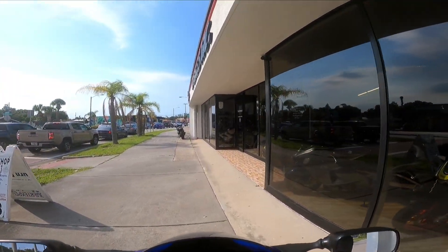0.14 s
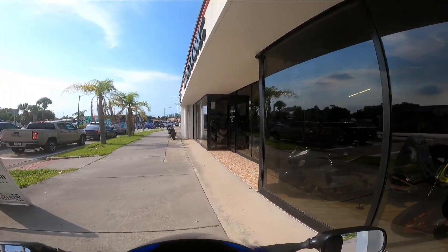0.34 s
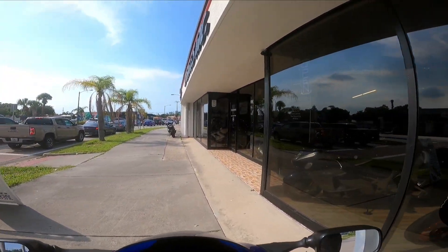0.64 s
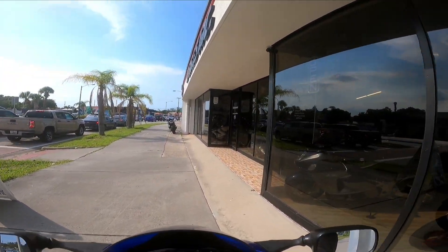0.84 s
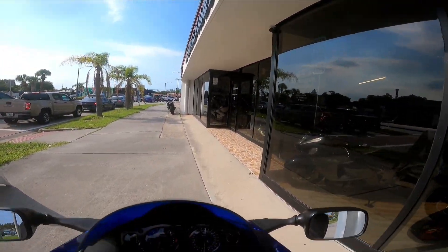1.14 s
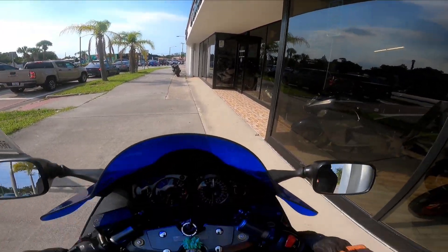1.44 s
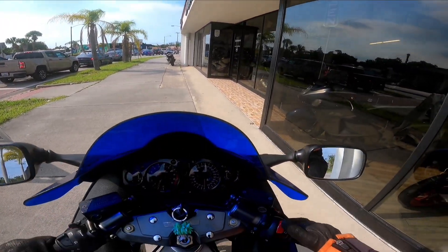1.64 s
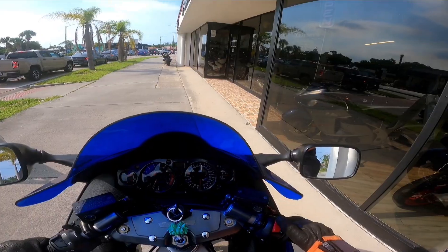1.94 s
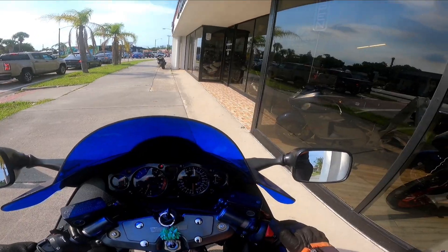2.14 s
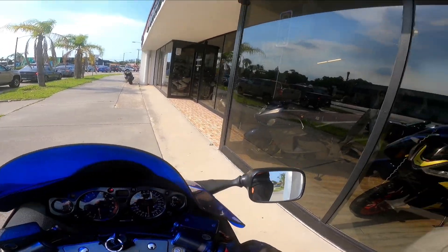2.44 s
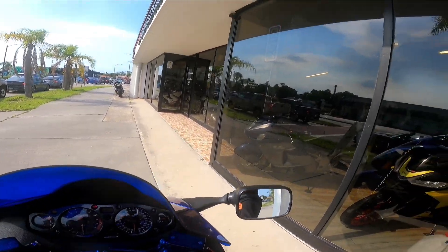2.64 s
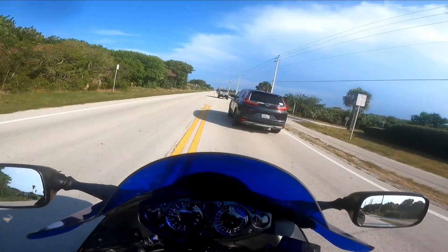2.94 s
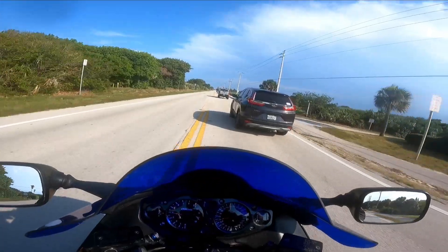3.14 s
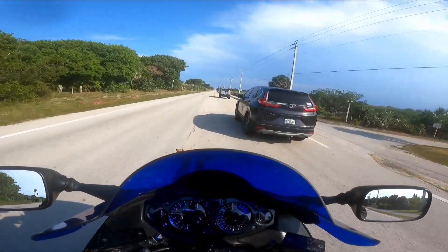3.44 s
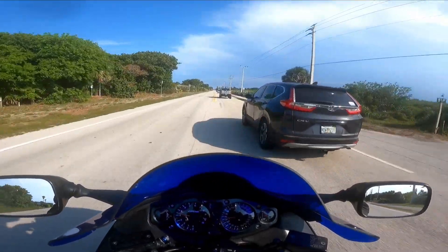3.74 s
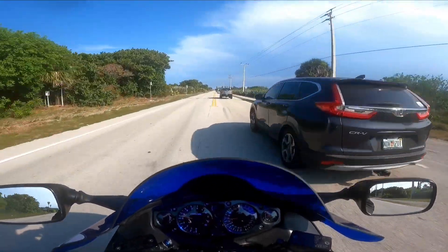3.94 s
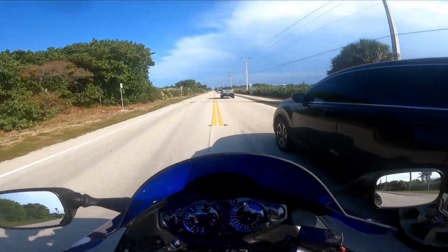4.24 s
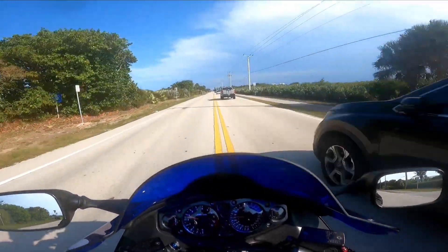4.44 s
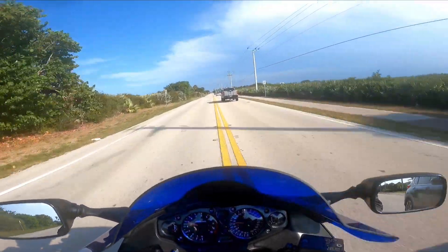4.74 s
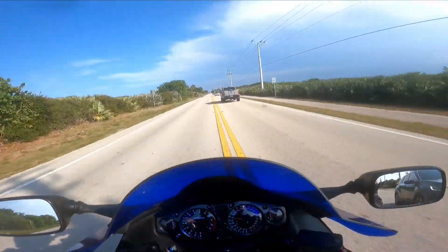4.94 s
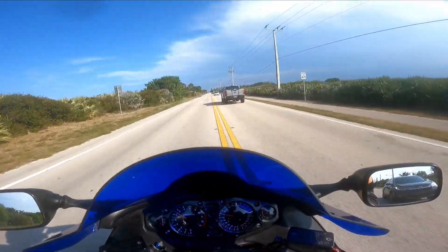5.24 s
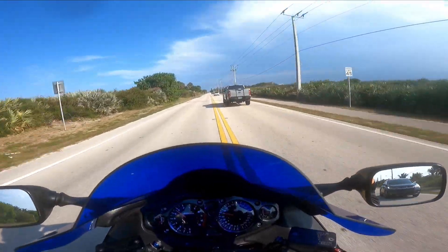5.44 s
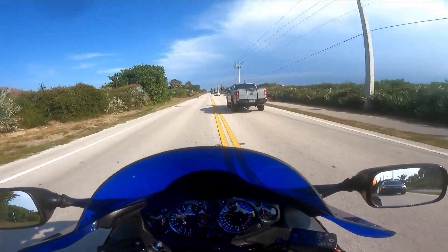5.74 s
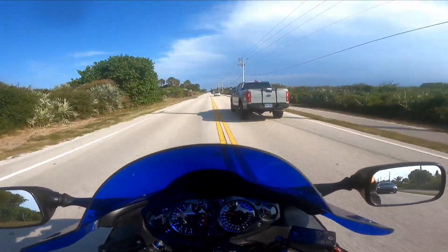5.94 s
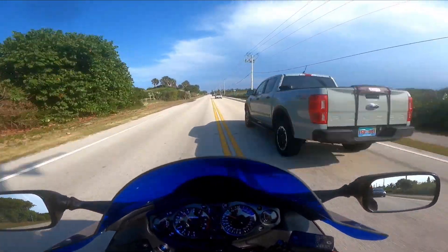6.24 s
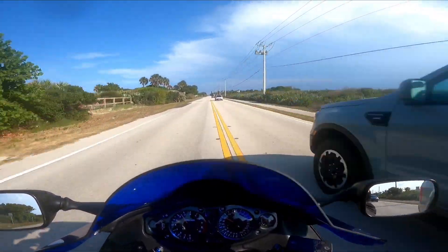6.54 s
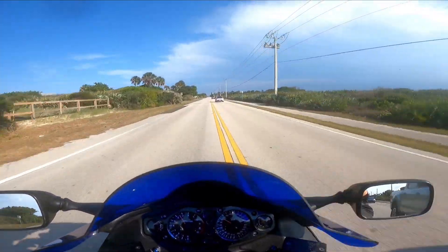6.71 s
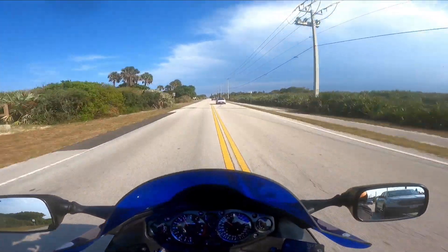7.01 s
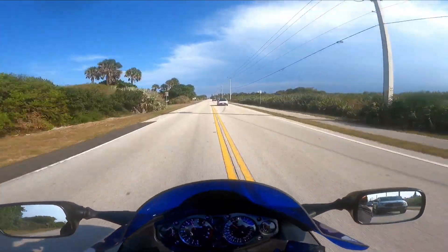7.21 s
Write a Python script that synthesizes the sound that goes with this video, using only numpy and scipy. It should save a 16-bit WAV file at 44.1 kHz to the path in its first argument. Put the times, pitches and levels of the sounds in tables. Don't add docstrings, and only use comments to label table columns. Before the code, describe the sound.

A sport motorcycle idles in a low uneven drone, clicks off and dies, then after brief silence accelerates on an open road through buffeting wind.

```python
import sys
import numpy as np
from scipy import signal
from scipy.io import wavfile
from scipy.ndimage import uniform_filter1d

SR = 44100
rng = np.random.default_rng(int(sys.argv[2]) if len(sys.argv) > 2 else 0)


def elevation(decibels):
    levels = np.asarray(decibels, float)
    return 10 ** (levels / 20)


def to_wav(sig):
    pcm = np.clip(np.atleast_2d(sig), -1, 1) * 32767
    pcm = np.round(pcm).astype(np.int16)
    wavfile.write(sys.argv[1], SR, pcm.T)


N = 325017
TIME = np.arange(N) / SR


def evened(x):
    return x / np.sqrt(np.mean(x ** 2) + 1e-20)


def columns(rows):
    s, *values = np.transpose(rows)
    return [np.interp(TIME, s, v) for v in values]


def wander(hz):
    span = max(int(SR / 64 / hz / 3), 1)
    steps = rng.standard_normal(N // 64 + 2)
    steps = uniform_filter1d(uniform_filter1d(steps, span), span)
    return np.interp(np.arange(N) / 64, np.arange(len(steps)), evened(steps))


def noise(shape, size, patchy_db, flicker_db):
    frames, hz = 4 * N // size + 5, np.fft.rfftfreq(size, 1 / SR)
    a, b, patches = rng.standard_normal((frames, len(hz), 3)).T
    patches = uniform_filter1d(patches, size=size // 64, axis=0)
    patches = evened(uniform_filter1d(patches, size=8, axis=1))
    flicker = evened(uniform_filter1d(rng.standard_normal(frames), size=4))
    f, db = np.transpose(shape)
    colour_db = np.interp(np.log(hz + 1), np.log(f + 1), db, left=-90, right=-120)[:, None]
    z = (a + 1j * b) * elevation(colour_db + patchy_db * patches + flicker_db * flicker)
    return evened(signal.istft(z, nperseg=size, noverlap=size * 3 // 4)[1][:N])


def order(turns, k, wobble_db, slip, hz):
    phase = 2 * np.pi * (k * turns + rng.random()) + slip * wander(hz)
    return np.sqrt(2) * elevation(wobble_db * wander(hz)) * np.sin(phase)


def lift(hz, centre_hz, width_hz):
    return 1 / (1 + (2 * (hz - centre_hz) / width_hz) ** 2)


def resonances(hz, rows):
    return sum(elevation(top_db) * lift(hz, centre_hz, width_hz) for centre_hz, width_hz, top_db in rows)


def bumps(rows, width_s):
    return sum(db * np.exp(-((TIME - s) / width_s) ** 2) for s, db in rows)


def held(start, rise_s, hold_s, fall_s):
    t = TIME - start
    return np.clip(t / rise_s, 0, 1) * np.exp(-np.maximum(t - rise_s - hold_s, 0) / fall_s)


# (time [s], firing rate [Hz], stroke strength [dB])
IDLE_SPEED = [(0, 37.26, -13), (.2, 37.26, 2), (.4, 39.34, -1.5), (.55, 39.53, 1), (.7, 39, -1),
              (.85, 36.91, 2), (.95, 37.72, 2), (1.04, 37.17, -0.5), (1.15, 40.46, -2), (1.35, 40.15, 2.5),
              (1.52, 39, -4), (1.66, 39.3, 0), (1.84, 37.3, -9), (2.03, 40.9, -3.5), (2.2, 38.82, -2.5),
              (2.3, 33.97, -4), (2.45, 26.55, 4)]


def idle_strokes():
    firing, stroke_db = columns(IDLE_SPEED)
    off_s, rundown_db_per_s = 2.18, -65
    run_db = rundown_db_per_s * np.maximum(TIME - off_s, 0)
    return firing, stroke_db, np.cumsum(firing) / SR, run_db


# (time [s], level [dB])
TANK_SHUDDERS = [(.24, 2.5), (.4, 7), (.67, 4), (.85, 5), (1.03, 5), (1.3, 10.5), (1.52, 9), (1.63, -5),
                 (1.7, 4.5), (1.77, -6.5), (1.9, 6), (2.1, 5)]


def firing_boom():
    firing, stroke_db, turns, run_db = idle_strokes()
    boom_db = -15.5 + 1.7 * (firing - 39) + stroke_db
    even_db = -23 - 7 * TIME + .3 * run_db
    third_db = -22.5 + bumps(TANK_SHUDDERS, width_s=.05) + 1.1 * run_db
    tank = 0.31 + lift(3 * firing, 110, 14)
    airbox = .25 + lift(4 * firing, 149, 16)
    out = elevation(boom_db) * order(turns, 1, wobble_db=.6, slip=.1, hz=6)
    out += elevation(even_db) * order(turns, 2, wobble_db=.8, slip=.15, hz=7)
    out += elevation(third_db) * tank * order(turns, 3, wobble_db=.9, slip=.25, hz=9)
    return out + elevation(even_db - 1) * airbox * order(turns, 4, wobble_db=1.3, slip=.25, hz=8)


# (pitch [Hz], width [Hz])
FAIRING_PANELS = [
    (245, 19),
    (283, 26),
]
# (start [s], length [s], sixth order level [dB], seventh order level [dB])
FAIRING_BUZZES = [
    (0.014, 0.093, -22.5, -25),
    (.36, 0.46, -33, -30.5),
    (1.073, .3, -29.5, -35),
    (1.553, 0.27, -25, -33.5),
    (2.031, 0.12, -30, -34),
]


def fairing_buzz():
    firing, _, turns, run_db = idle_strokes()
    strong = 1 + .5 * np.cos(np.pi / 2 * (turns - turns[round(1.133 * SR)]))
    out = np.zeros(N)
    for i, (hz, width_hz) in enumerate(FAIRING_PANELS):
        k = i + 6
        panel = .15 + lift(k * firing, hz, width_hz)
        buzz = sum(elevation(levels_db[i]) * held(s, .04, length, .05)
                   for s, length, *levels_db in FAIRING_BUZZES)
        tone = order(turns, k, wobble_db=1.2, slip=.4, hz=10)
        out += (elevation(-35 + run_db) + buzz) * strong * panel * tone
    return out


# (pitch [Hz], level per Hz [dB])
LUMP_COLOUR = [(15, -18.5), (30, -19.5), (50, -10.5), (75, 3.5), (115, 1.5), (150, -6), (190, -10),
               (260, -14), (330, -28)]
# (pitch [Hz], level per Hz [dB])
THRUM_COLOUR = [(230, -16), (300, 0), (340, -7), (400, -1.5), (480, -9.5), (600, -19), (800, -41.5)]
# (pitch [Hz], level per Hz [dB])
CASE_COLOUR = [(450, -31.5), (560, -1.5), (680, -8.5), (800, -0.5), (930, -1.5), (1020, 2), (1250, -2),
               (1570, -8.5), (1700, -1.5), (1920, -8), (2300, -26), (3000, -42)]
# (pitch [Hz], level per Hz [dB])
CLATTER_COLOUR = [(1900, -4), (2300, -0.5), (2600, -5), (2850, -3.5), (3300, -7), (4200, -12.5),
                  (5000, -18), (6300, -22), (8000, -27.0), (9000, -34), (11000, -40.5), (15000, -43.5)]
# (thrum [dB], case [dB], clatter [dB], lumps [dB])
REST_DROP = (-16, -16, -15.5, -9)
# (thrum [dB], case [dB], clatter [dB])
GASP_LEVEL = (-33.5, -40.5, -55.5)
# (thrum [dB], case [dB], clatter [dB])
SETTLE_LEVEL = (-51, -52.5, -76)


def engine_noise():
    _, _, turns, run_db = idle_strokes()
    gasp = held(2.343, rise_s=.011, hold_s=0.072, fall_s=0.035)
    settle = held(2.55, rise_s=0.11, hold_s=1, fall_s=1)
    running_db = (-35.5, -41, -52, -23)
    *levels, lumps = [elevation(db + np.maximum(0.59 * run_db, rest_db))
                      for db, rest_db in zip(running_db, REST_DROP)]
    thrum, case, clatter = [level + elevation(gasp_db) * gasp + elevation(settle_db) * settle
                            for level, gasp_db, settle_db in zip(levels, GASP_LEVEL, SETTLE_LEVEL)]
    stroke = 1 + 0.088 * np.cos(2 * np.pi * turns)
    out = lumps * noise(LUMP_COLOUR, size=4096, patchy_db=.5, flicker_db=.2)
    for k in range(9, 13):
        out += elevation(-17.0) * thrum * order(turns, k, wobble_db=3.0, slip=0.75, hz=4.5)
    out += elevation(-1.5) * thrum * stroke * noise(THRUM_COLOUR, size=2048, patchy_db=.5, flicker_db=.2)
    out += case * stroke * noise(CASE_COLOUR, size=1024, patchy_db=0.6, flicker_db=0.4)
    return out + elevation(4.5) * clatter * stroke * noise(CLATTER_COLOUR, size=512, patchy_db=1.4, flicker_db=-1.44)


# (time [s], level [dB])
DRONE_LEVEL = [(0, -16), (.45, -28.5), (.95, -21), (1.3, -21.5), (1.7, -18.5), (2.15, -19), (2.7, -24.5),
               (2.77, -49)]
# (time [s], level [dB])
FRAME_SWAYS = [
    (2.3, 3.5),
    (2.41, -7),
    (2.5, 6),
    (2.65, 0.5),
]


def drone():
    hz = 49.05 + .9 * wander(3)
    level_db = columns(DRONE_LEVEL)[0] + bumps(FRAME_SWAYS, width_s=.04)
    return elevation(level_db) * order(np.cumsum(hz) / SR, 1, wobble_db=1.1, slip=.3, hz=6)


# (pitch [Hz], level per Hz [dB])
STREET_COLOUR = [(100, -14.5), (160, 0), (250, -18.5), (400, -8.5), (600, -7.5), (900, -19), (1500, -19.5),
                 (2200, -37.5)]


def street():
    return elevation(-43.5) * noise(STREET_COLOUR, size=2048, patchy_db=0.8, flicker_db=-0.9)


# (time [s], peak level [dB])
KEY_CLICK = [
    (2.1186, -30.5),
]
# (pitch [Hz], level [dB])
BRAKE_TONES = [
    (4100, -70),
    (4980, -71),
]
# (time [s], peak level [dB], pitch [Hz])
FRAME_ROCK = (2.7485, -11.5, 43)


def switch_off():
    out = np.zeros(N)
    thin_band = signal.butter(2, [5200, 9500], "band", fs=SR, output="sos")
    for s, db in KEY_CLICK:
        t = np.maximum(TIME - s, 0)
        thin = signal.sosfilt(thin_band, rng.standard_normal(N))
        out += elevation(db - 5.0) * thin * (1 - np.exp(-t / 0.00056)) * np.exp(-t / 0.0071)
    for hz, db in BRAKE_TONES:
        squeak = order(hz * TIME, 1, wobble_db=3, slip=.6, hz=20)
        out += elevation(db) * squeak * np.exp(-((TIME - 2.56) / .08) ** 2)
    s, db, hz = FRAME_ROCK
    t = np.maximum(TIME - s, 0)
    return out + elevation(db) * np.sin(2 * np.pi * hz * t) * (1 - np.exp(-t / 0.0026))


# (time [s], turns per second [Hz])
CRANK_SPEED = [(3, 63), (3.15, 64.3), (3.55, 68.2), (3.85, 71.6), (4.05, 73.9), (4.45, 78.8), (4.85, 83.7),
               (5.25, 88.5), (5.65, 93.4), (6.05, 98.6), (6.25, 101.2), (6.45, 103.2), (6.65, 104.6),
               (6.95, 105.9), (7.37, 107.7)]
# (time [s], level [dB])
THROTTLE_LOAD = [(3, 3.5), (3.3, -1.5), (3.6, 1.5), (4.1, -4.5), (4.8, 2), (5.3, -0.5), (5.9, -2.5),
                 (6.3, -6), (6.7, -4), (6.9, -7.5), (7.37, -10)]
# (crank order [1], level [dB], share of the load [1])
LOW_TONES = [
    (2, 0, 0.037),
    (3, -26, 0.37),
    (4, -17.5, 0.42),
    (6, -20, 0.34),
]
# (pitch [Hz], width [Hz], level [dB])
MUFFLER_RINGS = [(133.3, 16.2, -17.5), (147.4, 18, -22.5), (180.8, 22, -20), (212.7, 7.1, -14),
                 (303.2, 31, -3), (367, 60, -5.5), (406.5, 48, -1)]
# (order [1], start [s], length [s], level [dB])
ROAD_ECHOES = [(2, 3.63, 0.1, -5.5), (2, 5, 0.17, -9.5), (2, 5.53, 0.12, -7.5), (2, 6.02, 0.16, -11),
               (3, 5.98, .65, 8), (3, 5.3, 0.65, -3), (4, 6.58, 0.31, -8), (4, 7.03, .3, 6.5),
               (4, 3.3, 0.28, 4.5), (4, 4.7, 0.28, 0.5), (2, 6.22, 0.23, -2.5), (6, 3.3, .25, 2.5),
               (6, 3.3, .3, -9.5)]
# (crank order [1], level [dB])
HOWL_TONES = [(5, -6.5), (7, -6), (8, 2.5), (9, -8), (10, -0.5), (11, -4), (12, 1.5), (13, 0.5), (14, -1.5),
              (15, 0), (16, -2.5), (17, -8), (18, -12.5), (19, -17.5), (20, -18), (21, -19), (22, -12.5),
              (23, -11), (24, 1.5), (25, 2), (26, -8), (27, 0)]
# (pitch [Hz], width [Hz], level [dB])
PIPE_RINGS = [(328, 200, 7), (498, 63, -0.5), (623, 34, -10), (848, 68, -2.5), (946, 32, -5),
              (1035.3, 89, 1), (1302, 130, -5.5), (1720, 150, -10.5)]


def exhaust():
    (crank,), (load_db,) = columns(CRANK_SPEED), columns(THROTTLE_LOAD)
    turns = np.cumsum(crank) / SR
    grid_hz = np.arange(4000.)
    muffler = resonances(grid_hz, MUFFLER_RINGS)
    muffler *= elevation(-12 * (1 + np.tanh((grid_hz - 417) / 3)) / 2)
    out = np.zeros(N)
    for k, db, share in LOW_TONES:
        k = round(k)
        echo_db = sum(lift_db * held(s, 0.043, length, .04)
                      for n, s, length, lift_db in ROAD_ECHOES if round(n) == k)
        passed = elevation(db + share * load_db + echo_db) * np.interp(k * crank, grid_hz, muffler)
        out += passed * order(turns, k, wobble_db=.7, slip=.1, hz=6)
    pipe = resonances(grid_hz, PIPE_RINGS)
    halves = np.arange(5, 26) + .5
    halves_db = -13 + 9 * np.exp(-((halves - 11.8) / 4.8) ** 2)
    howl = np.zeros(N)
    for k, db in [*HOWL_TONES, *zip(halves, halves_db)]:
        k = round(2 * k) / 2
        stray = order(turns, k, wobble_db=2.6, slip=.032 * k, hz=7)
        howl += elevation(db) * np.interp(k * crank, grid_hz, pipe) * stray
    return out + elevation(-32 + load_db) * howl


# (time [s], level [dB])
HELMET_AIR = [(3.1, -1), (3.3, -4), (3.55, -0.5), (3.9, -1), (4.4, 1), (4.9, -0.5), (5.3, 1.5), (5.6, 0),
              (5.76, -2), (5.95, -0.5), (6.22, -3.5), (6.3, 0.5), (6.6, 2.5), (6.86, 2), (6.92, -2),
              (7.1, -1.5), (7.37, -0.5)]
# (time [s], level [dB])
GUST_THUMPS = [(3.15, 9.5), (3.67, 4), (3.8, -0.5), (4.45, 3), (5.1, 4), (5.62, 5.5), (5.75, 0.5),
               (6.2, 4.5), (6.79, 4.5), (7.33, 2)]
# (time [s], level [dB])
GUST_GRIT = [(3.915, 5), (4.025, 3.5), (4.08, 3), (4.14, 1), (4.3, 2), (4.43, 3.5), (4.73, 2.5),
             (5.21, 0.5), (6.69, 4), (7.15, 1), (7.25, 3.5)]
# (start [s], length [s], drumming level [dB])
VEHICLE_PASSES = [
    (3.672, 0.61, -21),
    (6.672, 0.037, -18.5),
]
# (pitch [Hz], level per Hz [dB])
BUFFET_COLOUR = [(53, -21.5), (90, -7.5), (124, -7), (177, 0), (252, -4.5), (323, -7), (448, -11.5),
                 (700, -32.5), (910, -43.5), (1540, -120)]
# (pitch [Hz], level per Hz [dB])
THUD_COLOUR = [(8.8, -43), (15, -4), (113, 1), (160, -7), (210, -30), (350, -120)]
# (pitch [Hz], level per Hz [dB])
DRUMMING_COLOUR = [(120, -31), (160, -6), (190, -1), (225, -11), (300, -23)]
# (pitch [Hz], level per Hz [dB])
ROAR_COLOUR = [(260, -14), (450, 0), (752, -2.5), (924, -5.5), (1030, -0.5), (1180, -6.5), (1300, -9.5),
               (1500, -9), (1760, -7), (1920, -10), (2600, -35.5), (3380, -59), (5720, -120)]
# (pitch [Hz], level per Hz [dB])
HISS_COLOUR = [(2000, 1.5), (2300, 0.5), (2550, -3.5), (2800, 0.5), (3400, -3), (4100, -4.5), (5000, -11),
               (6300, -18.5), (7800, -24), (8200, -34.5), (10300, -39.5), (10800, -44.5), (13000, -52.5),
               (15000, -64.5)]
# (pitch [Hz], level per Hz [dB])
AIR_COLOUR = [(5500, -22.5), (6500, -2), (8000, -1), (10200, -8), (10800, -18.5), (13000, -23),
              (15000, -32.5)]


def wind():
    (air_db,), (crank,), (load_db,) = columns(HELMET_AIR), columns(CRANK_SPEED), columns(THROTTLE_LOAD)
    speed_db = 20 * np.log10(crank / crank[-1])
    thumps_db, grit_db = bumps(GUST_THUMPS, width_s=0.076), bumps(GUST_GRIT, width_s=.012)
    buffet_db = -23 + 1.64 * speed_db + 0.22 * thumps_db
    roar_db = -25.5 + 0.4 * air_db + 0.17 * load_db + 0.45 * grit_db
    hiss_db = -37.5 + air_db + grit_db + .45 * wander(10)
    drum = elevation(-20.5 + 2.1 * speed_db)
    drum += sum(elevation(db) * held(s, 0.03, length, 0.057) for s, length, db in VEHICLE_PASSES)
    out = elevation(buffet_db + 6.5) * noise(BUFFET_COLOUR, size=2048, patchy_db=1.25, flicker_db=0.9)
    out += elevation(-20 + thumps_db) * noise(THUD_COLOUR, size=2048, patchy_db=1.36, flicker_db=-1.9)
    out += drum * noise(DRUMMING_COLOUR, size=4096, patchy_db=.6, flicker_db=.3)
    out += elevation(roar_db - 1.5) * noise(ROAR_COLOUR, size=1024, patchy_db=.9, flicker_db=.25)
    out += elevation(hiss_db + 2.5) * noise(HISS_COLOUR, size=512, patchy_db=0.64, flicker_db=0.15)
    thin_db = hiss_db - 16.5 + 2.8 * speed_db
    return out + elevation(thin_db) * noise(AIR_COLOUR, size=512, patchy_db=1.5, flicker_db=0.8)


# (time [s], level [dB])
ROAD_FADE = [
    (3.0, -93),
    (3.015, -51),
    (3.03, -24.5),
    (3.05, -13.5),
    (3.075, -6.5),
    (3.11, 1),
]


def scene():
    fade_db, = columns(ROAD_FADE)
    idle = firing_boom() + fairing_buzz() + engine_noise()
    kerb = (idle + drone() + street() + switch_off()) * (TIME < 2.7695)
    road = (exhaust() + wind()) * elevation(fade_db) * (TIME > ROAD_FADE[0][0])
    return (kerb + road)[None]


def top_cut(x):
    return signal.sosfilt(signal.butter(12, 15140, fs=SR, output="sos"), x)


def record(dry):
    power_db = 10 * np.log10(abs(uniform_filter1d(dry ** 2, size=1300, axis=1)) + 1e-12)
    level = dry / elevation(0.31 * np.maximum(power_db + 16.0, 0))
    ceiling = 0.62
    return top_cut(ceiling * np.tanh(level / ceiling))


dry = scene()
out = record(dry)
to_wav(out)
```